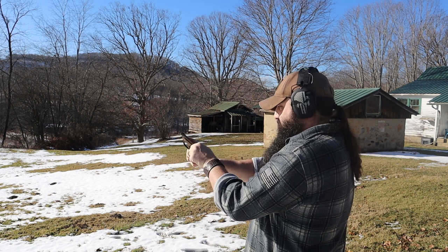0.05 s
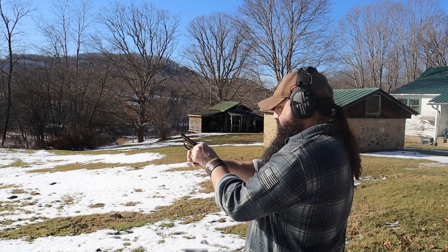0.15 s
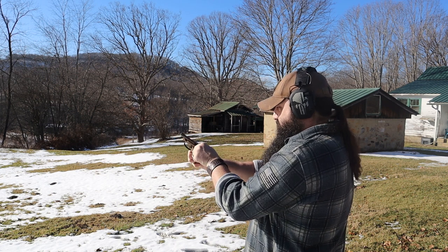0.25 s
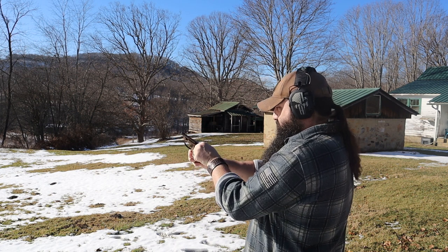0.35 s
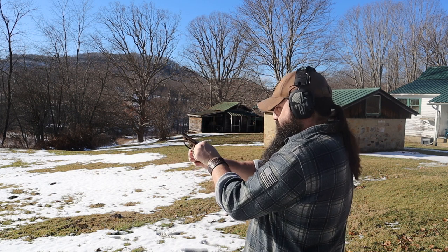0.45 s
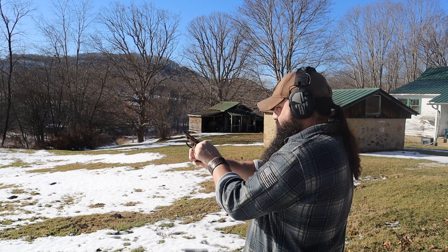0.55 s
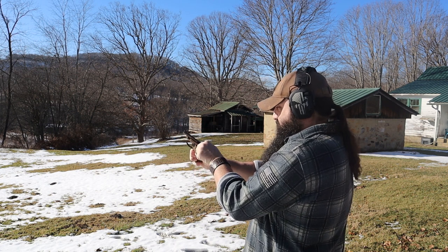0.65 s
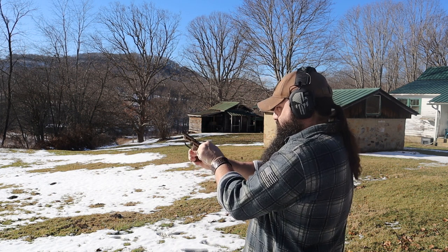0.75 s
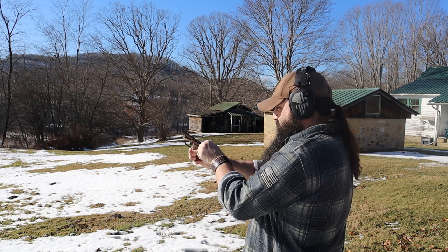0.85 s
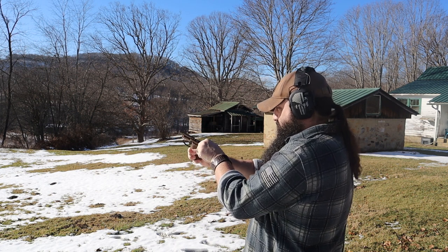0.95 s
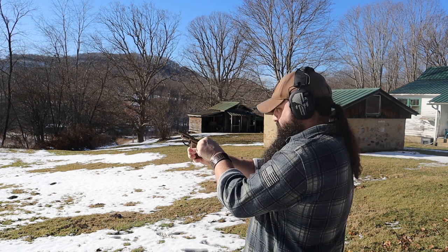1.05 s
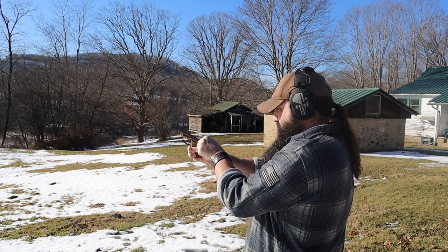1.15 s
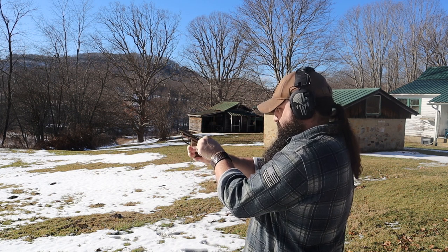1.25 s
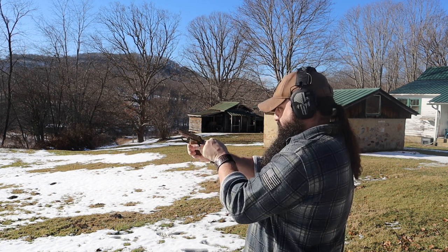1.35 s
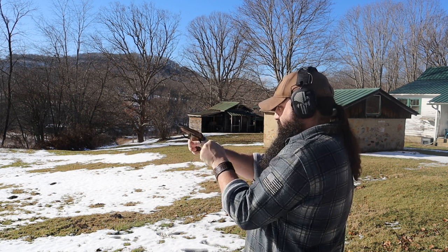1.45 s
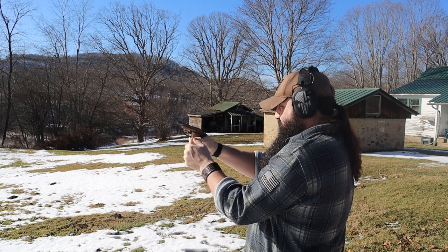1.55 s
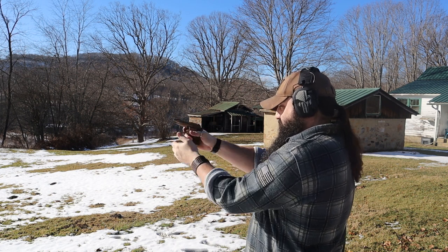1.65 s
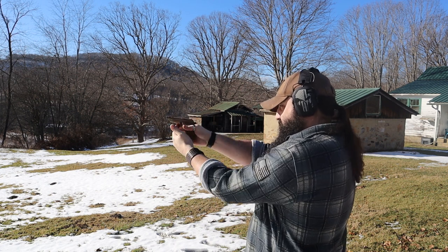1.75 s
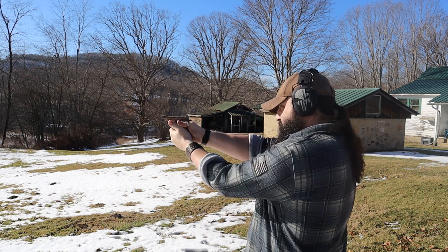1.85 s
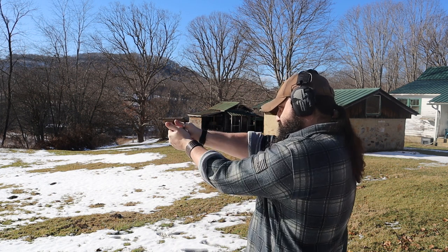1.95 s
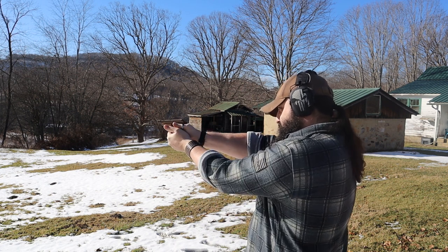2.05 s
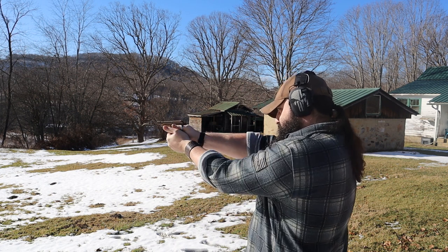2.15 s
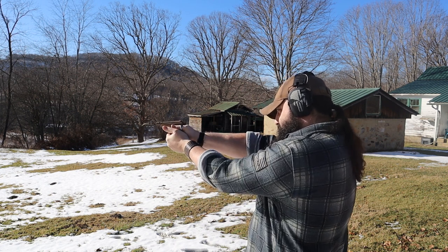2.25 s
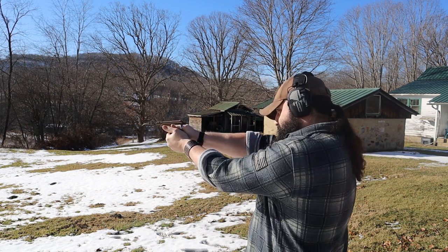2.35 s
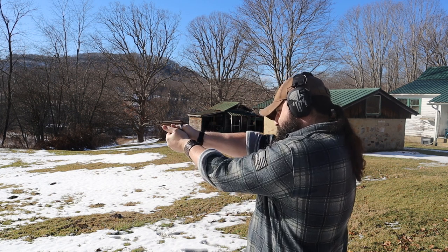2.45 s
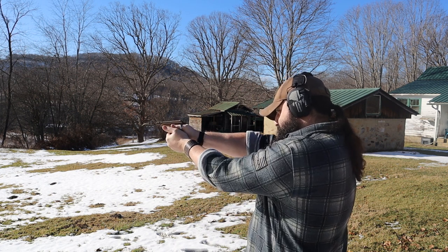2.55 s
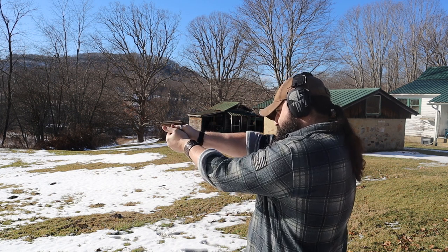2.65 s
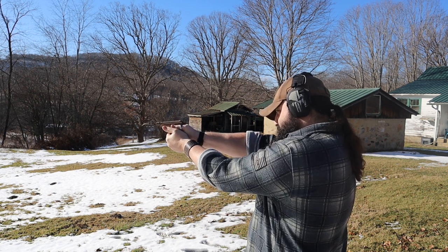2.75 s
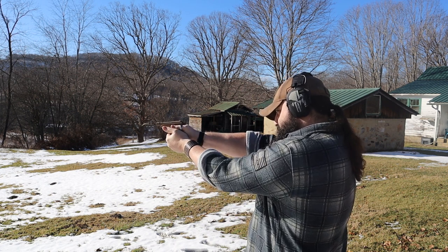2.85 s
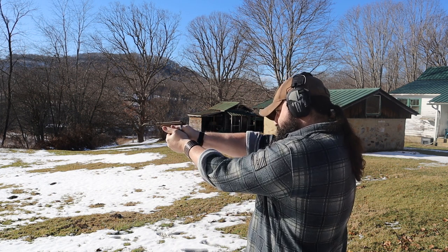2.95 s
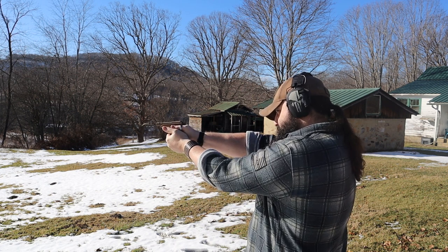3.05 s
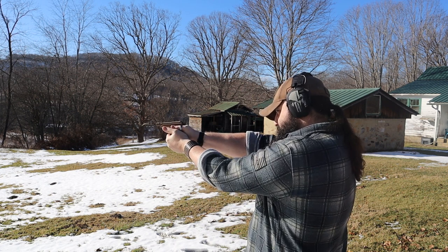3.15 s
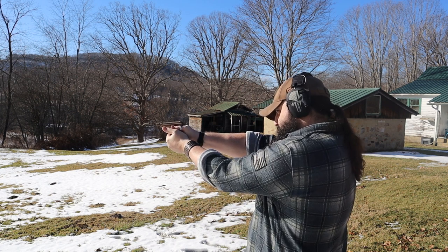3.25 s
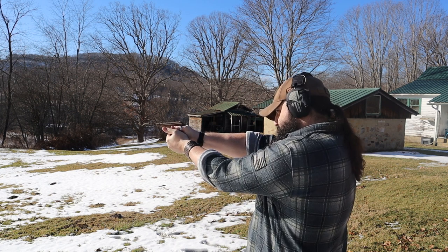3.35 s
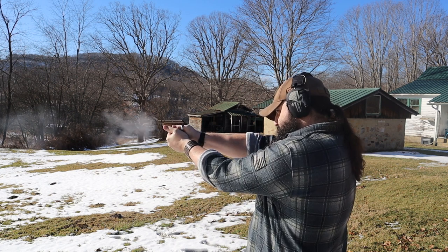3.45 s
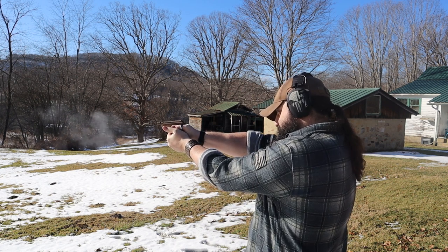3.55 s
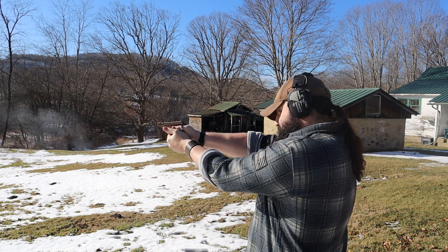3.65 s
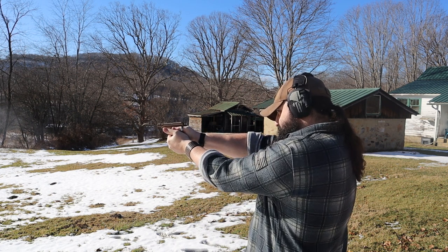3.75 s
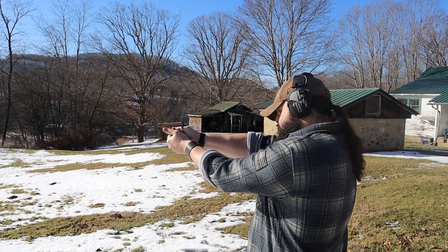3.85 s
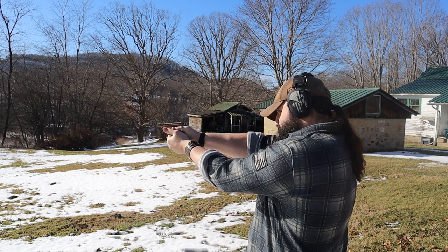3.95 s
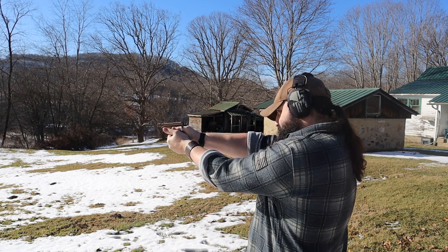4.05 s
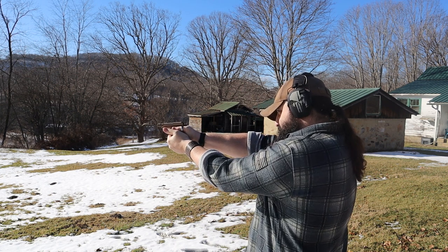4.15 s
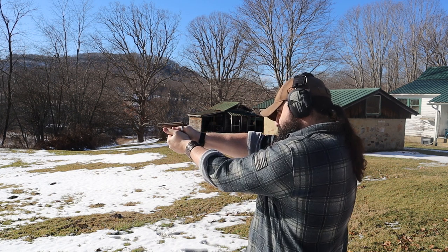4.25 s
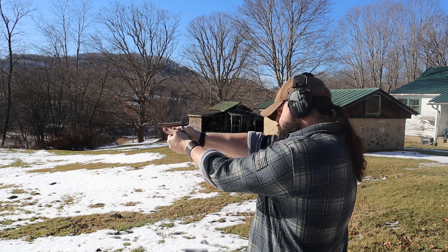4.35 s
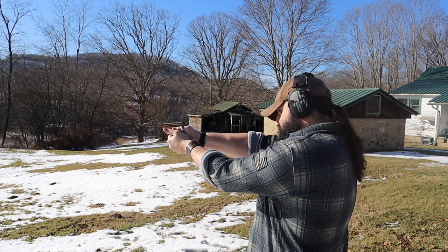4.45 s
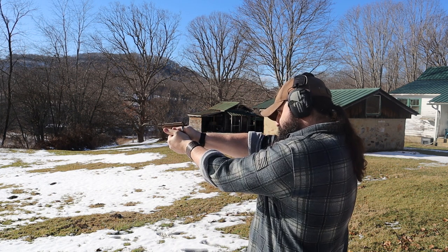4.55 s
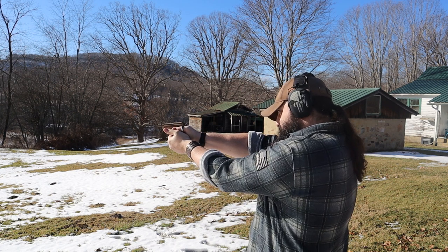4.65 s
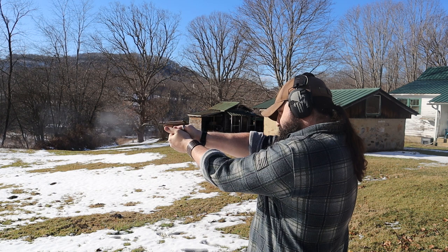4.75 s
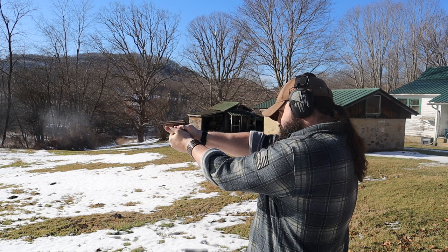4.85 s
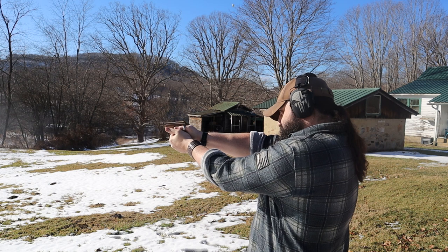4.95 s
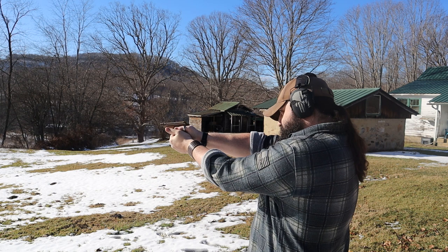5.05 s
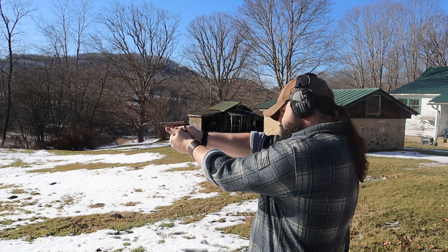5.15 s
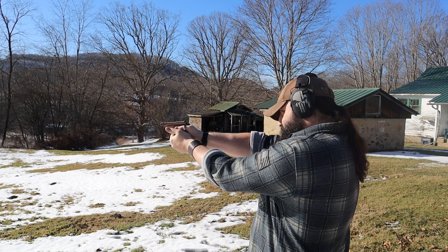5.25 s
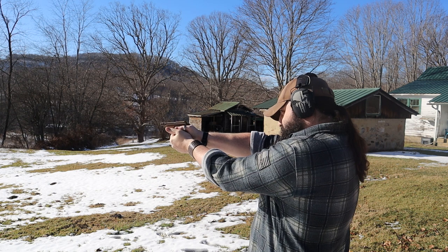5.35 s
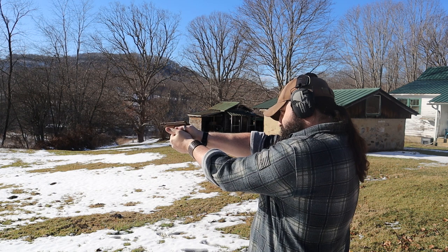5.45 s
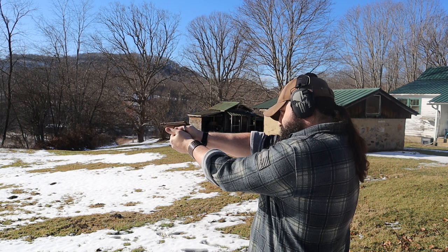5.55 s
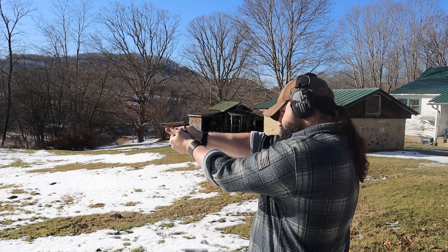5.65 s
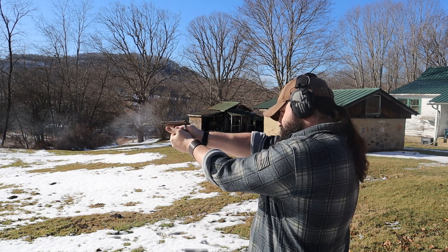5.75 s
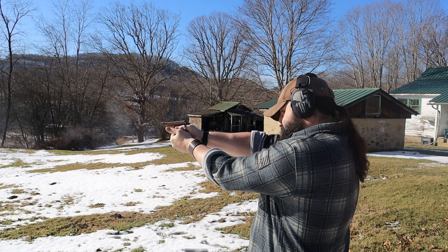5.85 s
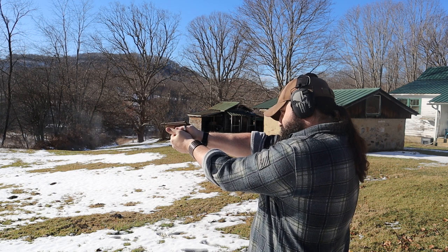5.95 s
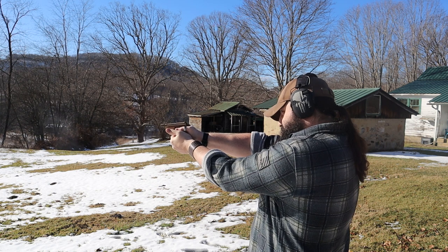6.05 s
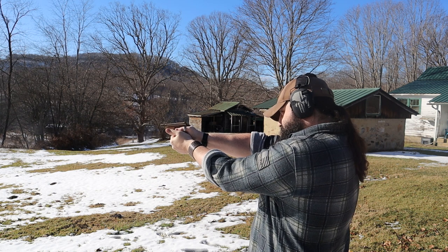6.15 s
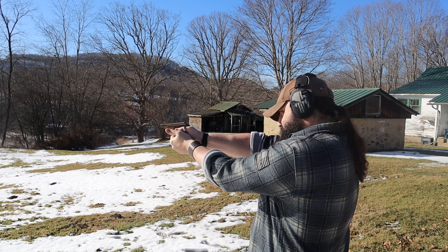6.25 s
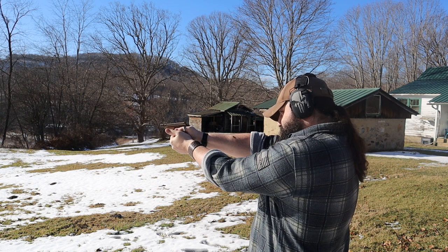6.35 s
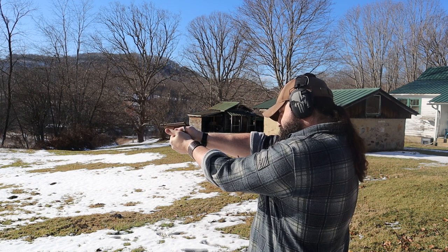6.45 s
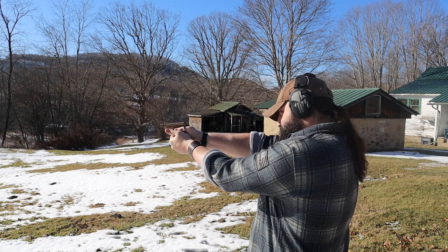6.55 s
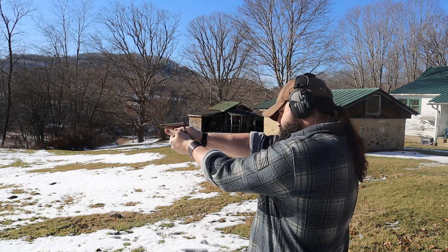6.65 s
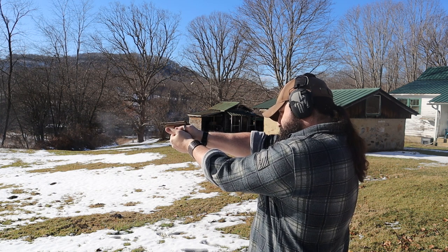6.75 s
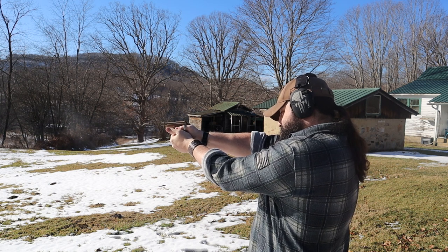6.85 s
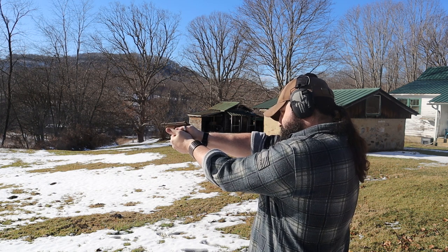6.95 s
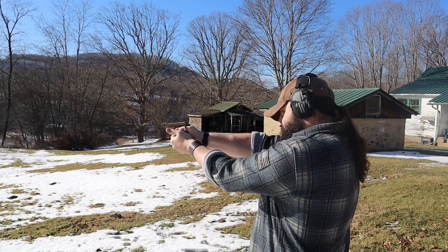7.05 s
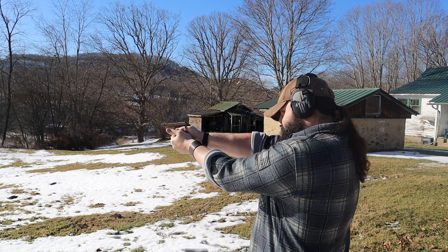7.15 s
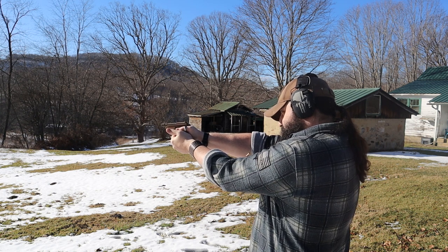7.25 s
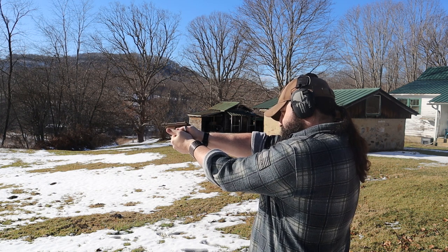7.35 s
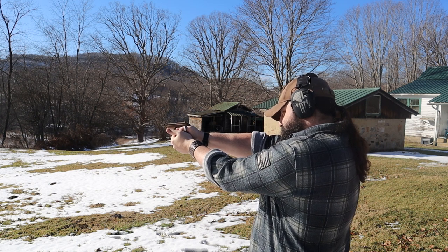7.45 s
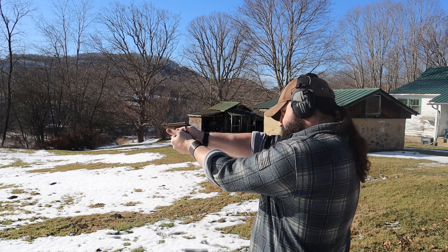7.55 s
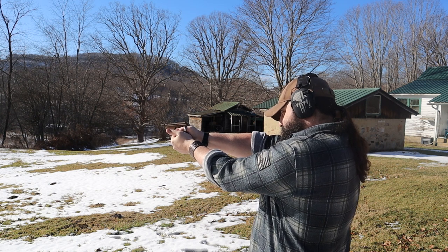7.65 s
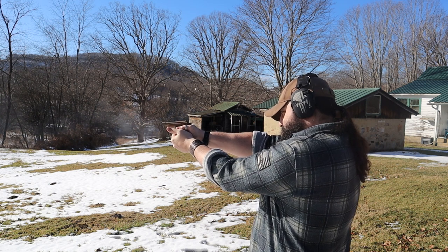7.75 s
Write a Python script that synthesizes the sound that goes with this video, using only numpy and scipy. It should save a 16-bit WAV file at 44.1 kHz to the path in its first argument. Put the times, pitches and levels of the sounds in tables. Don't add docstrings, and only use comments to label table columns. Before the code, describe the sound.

Steel pistol action clacks sharply on a quiet, lightly windy lawn, then four spaced, clipping gunshots crack and roll back from sheds, woods and hills.

```python
import sys
import numpy as np
from scipy import signal
from scipy.fft import rfft, irfft
from scipy.io import wavfile
from scipy.ndimage import uniform_filter1d

SR = 44100
rng = np.random.default_rng(int(sys.argv[2]) if len(sys.argv) > 2 else 0)


def level_to_linear(level):
    exponent = np.asarray(level, float) / 20
    return 10 ** exponent


def inscribe(sig):
    pcm = np.round(np.clip(np.atleast_2d(sig).T, -1, 1) * 32767)
    wavfile.write(sys.argv[1], SR, pcm.astype(np.int16))


N = 344421

# t/s, level/dB
BREEZE = [(0.0, -56), (0.3, -55.5), (1.7, -54), (2.2, -46), (2.55, -41), (2.7, -49), (3.45, -54),
          (3.9, -53), (4.13, -60), (4.3, -54), (4.75, -53), (5.0, -65), (5.2, -56), (5.75, -58), (6.0, -63),
          (6.2, -59), (6.7, -49), (7.0, -60)]
# t/s, level/dB, half width/s
GUSTS = [
    (1.302, -47, .04),
    (1.65, -49, 0.035),
    (2.0, -49, 0.054),
    (2.89, -40, .04),
    (3.32, -47, 0.059),
]
# f/Hz, level/dB
WIND_COLOUR = [(8.8, -40), (15, -2), (38, 1.5), (66, 2), (178, -10.5), (247, -17.5), (400, -25), (520, -59),
               (880, -120)]
# t/s when nearest, rumble level/dB, tyre level/dB, half width/s
TRAFFIC = [
    (0.0, -49, -60, 0.28),
    (0.4, -66, -61, .1),
    (1.0, -47, -63, 0.37),
    (2.15, -54, -72, 0.45),
    (2.67, -58.5, -60.5, 0.14),
    (3.1, -59.5, -68, 0.44),
]
# f/Hz, level/dB
VALLEY_COLOUR = [(88, -47), (150, -8), (311, -15), (398, -6.5), (529, 0.5), (1360, -13.5), (1930, -21),
                 (2500, -39), (3250, -63), (5500, -120)]
# f/Hz, level/dB
HISS_COLOUR = [(120, -26), (200, -4.5), (432, -7.5), (519, -7), (837, -11), (1080, -13.5), (1950, -15),
               (14900, -23), (16000, -25)]
# t/s, peak level/dB, grip knock level/dB, strongest ring f/Hz
CLICKS = [(0.0728, -35, -4, 3020), (0.0767, -39, -8, 3080), (0.1939, -39, -9, 3420), (0.2, -34, -14, 5200),
          (0.2055, -39, -14, 5200), (0.2264, -34, -14, 4000), (0.2193, -30, -12, 3910),
          (0.2452, -14, -4.5, 2420), (0.2502, -18, -15, 3600), (0.8402, -14, -17, 6100),
          (0.844, -4, -3.5, 4600), (0.8467, -2.5, -17, 6240), (0.8521, -8.5, -15, 4330),
          (1.4378, -27, -14, 5000), (1.4408, -19, -20, 3020), (1.4436, -12, -15, 4600),
          (1.4471, -2.5, -20, 3410), (1.4486, -2, -13.5, 5500), (1.4532, 4, -18.5, 3095),
          (1.4588, -4.5, -21.5, 3780), (1.464, -24, -25, 4560), (1.956, -26, -12, 2540),
          (2.1395, -35.5, -7, 3970), (2.1564, -31.5, -15, 4400), (2.215, -43, -9, 5060),
          (3.1262, -44, -12, 5190), (6.641, -37, -5, 5300)]
# f/Hz, level/dB
STEEL_COLOUR = [(1060, -52), (1800, -0.5), (2120, -5.5), (3290, 0.5), (4060, 0.5), (5910, 3.5),
                (8750, -5.5), (9680, 5), (11100, 1), (14500, -13), (16000, -24)]
# t/s, f/Hz, level/dB, six times its life/s
SPRING = (1.4535, 6450, -58, .9)
# t/s, peak level/dB, ring f/Hz, left minus right level/dB
WALLS = [(3.6542, 1.5, 1430, -6), (3.658, -11, 1290, -14), (3.663, -3, 1560, -15.5), (3.667, -8, 1540, -1),
         (3.6686, -8.5, 1500, 0), (3.691, -15, 1700, -12), (3.6975, -17, 1700, -10),
         (3.7029, -5.5, 1450, 8), (3.719, -7.5, 2100, 8), (3.7257, -12, 1510, -8), (3.7429, -10, 1210, 18),
         (3.7643, -12, 1160, 2), (3.7789, -8, 1760, 3), (3.786, -16, 1580, 1), (3.7953, -4.5, 1290, 3),
         (3.8263, -10.5, 1360, 12), (3.8316, -10, 1250, 9), (3.8652, -4, 1320, 8.5),
         (3.8674, -11.5, 1430, -15), (3.8726, -12, 1250, 12.5), (3.8774, -25, 1260, 8), (3.92, -9, 810, 2),
         (3.9398, -5.5, 1000, 0), (3.948, -35, 1040, 3), (3.9673, -13.5, 1020, 2), (4.1325, -31, 1010, 17),
         (4.1549, -13.5, 680, 5), (4.1577, -15, 1180, 4), (4.1984, -17, 1080, 2), (4.2015, -24.5, 880, 17)]
# f/Hz, level/dB
SMEAR_COLOUR = [(500, -18), (1000, -2), (1600, 0), (2600, -9), (4500, -30)]
# t/s after the blast, level/dB at 1 kHz
WOODS = [
    (0.03, -41.5),
    (0.1, -46),
    (0.18, -34),
    (0.298, -21.5),
    (0.429, -21),
    (0.49, -30),
    (0.72, -33.5),
    (0.9, -38.5),
    (1.15, -37.5),
]
# f/Hz, level/dB
WOODS_COLOUR = [(120, -33.5), (260, -32), (400, -15), (700, -5.5), (1100, 0), (1700, -2), (3500, -3.5),
                (7000, -16.5)]
# f/Hz, likeness 0-1
WOODS_LIKENESS = [(100, 1), (300, 0.84), (1000, 0.49), (3000, 0.32), (8000, 0)]
# f/Hz, loss/dB per s of travel
AIR_LOSS = [(1100, -0.67), (1700, 3.5), (2800, 18), (7000, 31)]
# arrival t/s, rise/s, hold/s, fall/dB per s, level/dB
YARD = (0.045, 0.035, 0.08, 150, -41)
# f/Hz, level/dB
YARD_COLOUR = [(120, -28), (350, -12), (1100, -3), (2800, -3), (4500, -1), (7000, -2), (11500, -16)]
# t/s of the blast front, gas hiss lead/ms, hiss level/dB, echo level/dB
SHOTS = [
    (3.5362, 1.9, -2, 0),
    (4.8167, 1.1, -2, 0),
    (5.8223, 1.25, -3, 0),
    (6.7922, 1.2, -2, 0),
]

FIRST_SHOT_S = SHOTS[0][0]
PORT_LAG = 2


def shaped(x, points):
    hz, db = np.transpose(points)
    f = np.fft.rfftfreq(x.shape[-1], 1 / SR) + 1
    gain = level_to_linear(np.interp(np.log(f), np.log(hz), db, left=-90, right=-90))
    y = irfft(rfft(x) * gain, x.shape[-1])
    return y / np.sqrt(np.mean(y ** 2))


def tone(points, hz):
    f, value = np.transpose(points)
    return np.interp(np.log(hz), np.log(f), value)


def walk(rate):
    k = int(SR / rate)
    steps = np.repeat(rng.standard_normal(N // k + 1), k)
    return 1.3 * uniform_filter1d(uniform_filter1d(steps, k), k)[:N]


def swells(s, db, half_s, floor):
    t = np.arange(N)[:, None] / SR
    bells = np.exp(-((t - s) / half_s) ** 2)
    return np.sqrt(floor ** 2 + np.sum(level_to_linear(db) ** 2 * bells, axis=1))


def sides(pan_db):
    return level_to_linear(np.array([pan_db, -pan_db]) / 2).reshape(2, -1)


def ports(x, pan_db, lag):
    return sides(pan_db) * np.array([x, np.roll(x, lag)])


def pair(mid, side, like):
    like = np.clip(like, 0, 1)
    apart = np.sqrt(1 - like) * side * np.array([[1], [-1]])
    return (np.sqrt(1 + like) * mid + apart) / np.sqrt(2)


def add(out, x, s):
    i = int(round(s * SR))
    n = max(min(x.shape[-1], out.shape[-1] - i), 0)
    out[..., i:i + n] += x[..., :n]


def noise():
    return rng.standard_normal((2, N))


def hiss():
    return shaped(noise(), HISS_COLOUR) * level_to_linear(-53.5)


def valley():
    s, rumble_db, tyre_db, half_s = np.transpose(TRAFFIC)
    rumble = pair(*shaped(noise(), VALLEY_COLOUR), 0.58)
    rumble = rumble * swells(s, rumble_db, half_s, level_to_linear(-67)) * level_to_linear(1.4 * walk(22.68))
    tyres = shaped(noise(), [(850, -23), (1040, -5), (1140, 4), (1400, -19)])
    return rumble + tyres * swells(s, tyre_db, half_s, level_to_linear(-69.5))


def wind():
    breeze = level_to_linear(np.interp(np.arange(N) / SR, *np.transpose(BREEZE)))
    gusts = swells(*np.transpose(GUSTS), breeze)
    buffets = pair(*shaped(noise(), WIND_COLOUR), 0.97)
    return buffets * gusts * level_to_linear(2.1 * walk(25) + 1.4 * walk(9))


def spring():
    t = np.arange(SR // 2) / SR
    _, hz, db, six_lives = SPRING
    wobble = level_to_linear(db + 5 * walk(60)[:len(t)]) * walk(700)[:len(t)]
    return wobble * np.sin(2 * np.pi * hz * t) * np.exp(-(t / six_lives * 6) ** 4)


def near_space():
    t = np.arange(SR // 2) / SR
    fade = level_to_linear(-27.5) * np.exp(-t / 0.0025) + level_to_linear(-58) * np.exp(-t / 0.055)
    space = rng.standard_normal((2, len(t))) * fade
    add(space, np.ones((2, 1)), 0)
    for s, db, _, pan_db in WALLS[:10]:
        add(space, level_to_linear(db - 37.5) * sides(pan_db), s - FIRST_SHOT_S)
    return space


def action():
    out = np.zeros((2, N))
    t = np.arange(-200, 1800) / SR
    t60_s = 0.013
    steel = shaped(rng.standard_normal((len(CLICKS), len(t))), STEEL_COLOUR)
    fall = np.where(t < 0, np.exp(t / 0.00042), np.exp(-np.log(1000) * t / t60_s))
    knock_shape = np.where(t < 0, np.exp(-(t / 0.0004) ** 2), 1 / np.cosh(t / 0.001))
    knock = np.cos(2 * np.pi * 1330 * t) * knock_shape
    for (s, peak_db, knock_db, hz), rattle in zip(CLICKS, steel):
        ring_db = -7 + 0.45 * max(-22 - peak_db, 0)
        parts = (rattle + level_to_linear(ring_db) * np.sin(2 * np.pi * hz * t)) * fall
        click = parts / abs(parts).max() + level_to_linear(knock_db) * knock
        add(out, level_to_linear(peak_db) * ports(click, 0.5, PORT_LAG), s + t[0])
    add(out, spring(), SPRING[0])
    small = signal.butter(N=2, Wn=800, btype="high", fs=SR, output="sos")
    return signal.sosfilt(small, signal.fftconvolve(out, near_space(), axes=1)[:, :N])


def scatter():
    clusters = uniform_filter1d(np.repeat(rng.standard_normal(SR // 20), 40), size=40)
    slopes = uniform_filter1d(np.repeat(rng.standard_normal(SR // 210), 420), size=420)
    return rng.standard_normal((2, 2 * SR)) * level_to_linear(2.3 * clusters + 1.5 * slopes)


def woods(grains):
    s, db = np.transpose(WOODS)
    t = np.arange(grains.shape[-1]) / SR
    far_db = np.interp(t, s, db) - 18.5 * np.maximum(t - s[-1], 0)
    start, rise, hold, fall_db, yard_db = YARD
    yard_fall = fall_db * np.maximum(t - start - rise - hold, 0)
    yard = np.clip((t - start) / rise, 0, 1) * level_to_linear(yard_db - yard_fall)
    spectrum = rfft(grains)
    octave = np.log2(np.fft.rfftfreq(len(t), 1 / SR) + 1)
    out = 0
    for hz in 125 * 2 ** np.arange(0, 7.1, .5):
        band = np.clip(1 - abs(octave - np.log2(hz)) * 2, 0, 1)
        mid, side = irfft(spectrum * band, len(t))
        colour_db = tone(WOODS_COLOUR + [(11500, -40)], hz)
        far = level_to_linear(far_db + colour_db - tone(AIR_LOSS, hz) * t)
        gain = np.hypot(far, yard * level_to_linear(tone(YARD_COLOUR, hz)))
        out = out + pair(mid, side, tone(WOODS_LIKENESS, hz)) / mid.std() * gain / np.sqrt(2)
    return out * (t > .02)


def walls():
    out = np.zeros((2, 2 * SR))
    t = np.arange(-200, 1000) / SR
    edge_colour = [(1800, -12), (3200, 3.5), (5500, 4), (9000, -6), (16000, -24)]
    edges = shaped(rng.standard_normal((len(WALLS), len(t))), edge_colour)
    tails = shaped(rng.standard_normal((len(WALLS), len(t))), SMEAR_COLOUR)
    tails = tails * level_to_linear(-18) * np.clip(t / 0.00086, 0, 1) * np.exp(-t / .005)
    for (s, db, hz, pan_db), grit, tail in zip(WALLS, edges, tails):
        late = s - FIRST_SHOT_S
        u = t * hz / (1.02 + 2.1 * late)
        edge_db = -13.5 - 55 * late
        swell = np.where(t < 0, np.exp(-(u / 0.42) ** 2), np.exp(-u / .5))
        ring = swell * np.cos(2 * np.pi * hz * t)
        slap = tail - ring + level_to_linear(edge_db) * grit * np.exp(-abs(t) / 0.0014)
        lag = int(round(1 + pan_db / 4))
        add(out, level_to_linear(db) * ports(slap, pan_db, lag), s + t[0] - FIRST_SHOT_S)
    small = signal.butter(N=2, Wn=450, btype="high", fs=SR, output="sos")
    return signal.sosfilt(small, out)


def blast(lead_ms, hiss_db):
    t = np.arange(-.006 * SR, .06 * SR) / SR
    after = np.maximum(t, 0)
    g = np.maximum(t - .0057, 0)
    gas_colour = [(1500, 3.5), (3500, -8), (5500, -1.5), (9000, -3.5), (16000, -21)]
    gas = shaped(rng.standard_normal(len(t)), gas_colour)
    tick = level_to_linear(-18.5) * (t > -.0042)
    lead = (t < 0) * (level_to_linear(hiss_db) * (t > -lead_ms / 1000) + tick)
    front = 3 * (t > -.00005) * (t < .0003)
    swing = (t > .0003) * (.58 - 2.45 * np.exp(-(after / .00192) ** 2))
    held = np.exp(-(g / .002) ** 2)
    creep = np.exp(-(g / .0075) ** 2) - .08 * np.exp(-g / .02)
    swing = swing * held - .38 * (1 - held) * creep
    push = .8 * np.exp(-(g / .0012) ** 4) - 1.6 * np.exp(-((g - .0007) / .00006) ** 2)
    ring = .31 * (g > .0012) * np.exp(-g / .003) * np.cos(2 * np.pi * 1650 * (g - .0018))
    direct = gas * lead + front + swing + (g > 0) * push + ring
    rustle_colour = [(300, -6), (1200, -6.5), (4000, -12.5), (8000, -20), (16000, -18)]
    rustle = shaped(rng.standard_normal((2, len(t))), rustle_colour)
    before_bounce = (t > 0) * level_to_linear(-23) * (g == 0)
    after_bounce = (g > 0) * (level_to_linear(-11) * np.exp(-g / .0025) + level_to_linear(-20) * np.exp(-g / 0.012))
    return ports(direct, 0, PORT_LAG) + rustle * (before_bounce + after_bounce)


def shots():
    out = np.zeros((2, N))
    slaps, trees = walls(), scatter()
    moved = .08
    for s, lead_ms, hiss_db, echo_db in SHOTS:
        add(out, blast(lead_ms, hiss_db), s - .006)
        grains = np.sqrt(1 - moved) * trees + np.sqrt(moved) * scatter()
        add(out, level_to_linear(echo_db) * (slaps + woods(grains)), s)
    return out


def scene():
    loud = shots() + action()
    background = wind() + valley() + hiss()
    keep = np.exp(-1 / (.6 * SR))
    power = np.minimum(np.mean(loud ** 2, axis=0), 1)
    push = signal.lfilter([1 - keep], [1, -keep], power)
    return loud + background / (1 + push / level_to_linear(-42)) ** 0.45


def band_limit(x):
    return signal.sosfilt(signal.butter(12, 16190, fs=SR, output="sos"), x)


def record(dry):
    mix = np.clip(dry, -.99, .99)
    return band_limit(mix)


dry = scene()
out = record(dry)
inscribe(out)
```